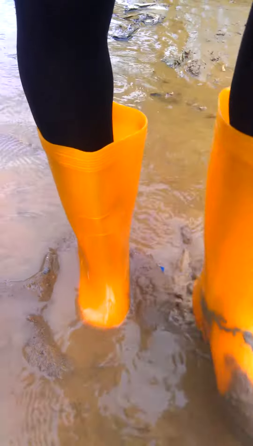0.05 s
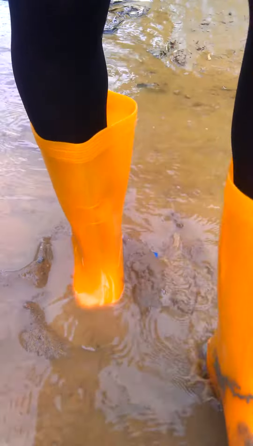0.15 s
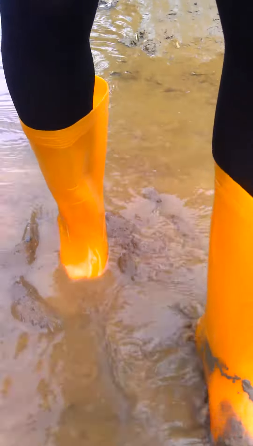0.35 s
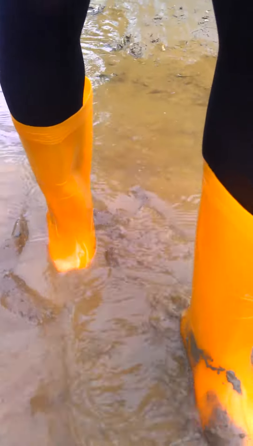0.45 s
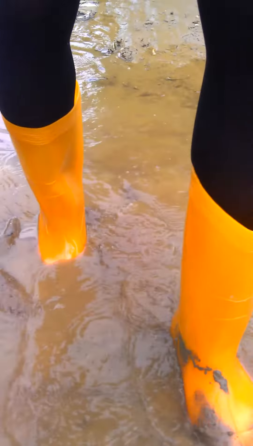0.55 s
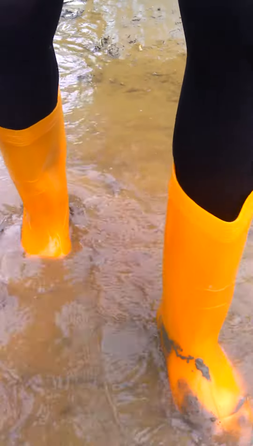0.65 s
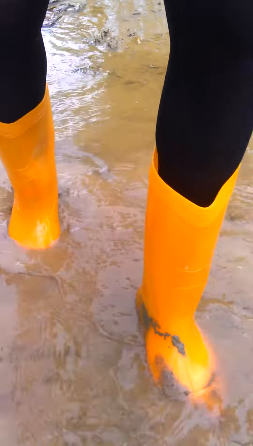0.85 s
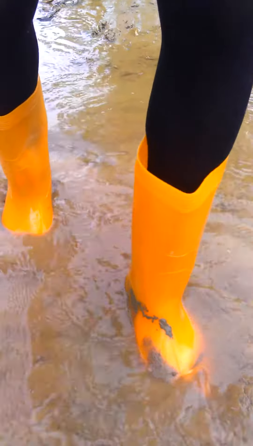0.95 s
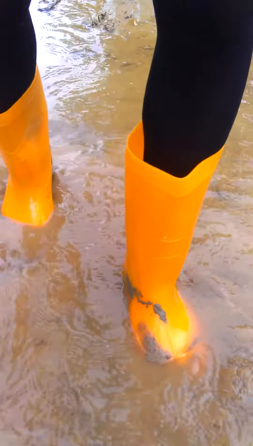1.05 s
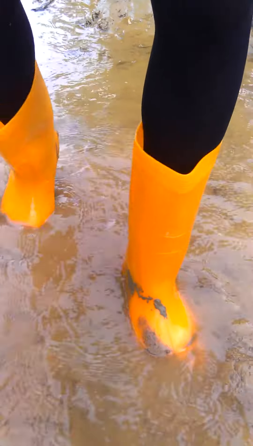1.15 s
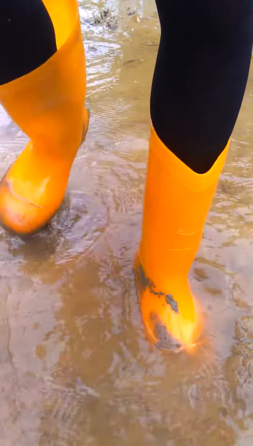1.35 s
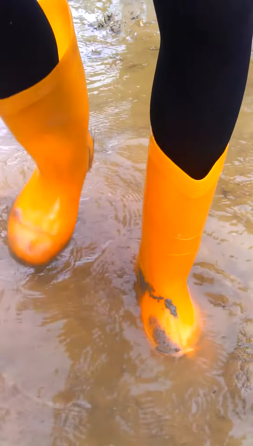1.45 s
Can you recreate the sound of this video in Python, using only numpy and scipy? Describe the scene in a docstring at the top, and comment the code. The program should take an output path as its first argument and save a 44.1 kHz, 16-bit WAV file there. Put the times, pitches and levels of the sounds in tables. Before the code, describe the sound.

A rubber boot presses into mud under shallow water close by, making one short, bright squelch followed by a soft plop and drips. A small bird then chirps twice far off, over a faint outdoor rush.

```python
"""Boot in flooded mud

A rubber boot presses into mud under shallow water. A few mud films and bubbles tick, trapped air
bursts out in one short, bright squelch, and the water closes with a plop and some drips.
A small bird chirps twice far off, over a faint outdoor rush."""
import sys
import numpy as np
from scipy import signal
from scipy.fft import rfft, irfft
from scipy.io import wavfile

SR = 44100
rng = np.random.default_rng(int(sys.argv[2]) if len(sys.argv) > 2 else 0)


def transcribe(signal):
    """Save signal, clipped to [-1, 1], as a 16-bit WAV file at the path in sys.argv[1]."""
    frames = np.atleast_2d(signal).T
    limited = np.clip(frames, -1, 1)
    pcm = np.round(limited * 32767).astype(np.int16)
    wavfile.write(sys.argv[1], SR, pcm)


N = 66150
T = np.arange(N) / SR

# Spectrum of spray and mud crackle: freq_hz, gain_db
WET_SPECTRUM = [(100, -20), (260, -7.5), (480, -1.5), (700, -16.5), (1200, -1.5), (2200, 3.5), (3300, 1),
                (4500, -1.5), (6300, 0.5), (7700, 2.5), (10000, 2), (12000, 1.5)]


def undb(db):
    """Decibels to gain."""
    return 10 ** (np.asarray(db) / 20)


def unit(x):
    """Scale to rms 1."""
    return x / np.sqrt(np.mean(x ** 2))


def colour(x, points):
    """Minimum-phase filter through (freq_hz, gain_db) points."""
    hz, db = np.array(points).T
    freq_hz = np.maximum(np.fft.rfftfreq(2 * N, 1 / SR), 1)
    gain = undb(np.interp(np.log(freq_hz), np.log(hz), db))
    cepstrum = irfft(np.log(gain))
    cepstrum[1:N] *= 2
    cepstrum[N + 1:] = 0
    return irfft(rfft(x, 2 * N) * np.exp(rfft(cepstrum)))[:N]


def wander(bandwidth_hz):
    """Smooth random signal, rms 1."""
    lowpass = np.exp(-(np.fft.rfftfreq(N, 1 / SR) / bandwidth_hz) ** 2)
    return unit(irfft(rfft(rng.standard_normal(N)) * lowpass, N))


def since(start_s):
    """Seconds since an event, zero before it."""
    return np.maximum(T - start_s, 0)


def echoes(x, t60_s):
    """Diffuse reflections: a decaying noise tail of unit energy."""
    tail = rng.standard_normal(N) * np.exp(-np.log(1000) * T / t60_s)
    return signal.fftconvolve(x, tail / np.linalg.norm(tail))[:N]


def outdoor_rush():
    """A distant rush wavers in four bands and slowly eases, with a smooth hiss on top."""
    # Rush spectrum: freq_hz, gain_db
    spectrum = [(24, -71), (40, -41), (97, -24), (162, -12.5), (289, -3), (450, -2), (542, -3.5),
                (609, -3.5), (668, -6.5), (786, -2), (992, -1.5), (1140, -2), (1250, -1.5), (1770, -6),
                (2400, -15), (3330, -12.5), (4010, -17), (8840, -13.5), (10400, -16.5), (13500, -64),
                (22000, -120)]
    level_db, fade_db_per_s, flicker_db = -50.5, 2, 1.5
    edges_hz = [180, 360, 720, 1400, 2400]
    freq_hz = np.fft.rfftfreq(N, 1 / SR)
    noise = colour(rng.standard_normal(N), spectrum)
    out = noise.copy()
    for low_hz, high_hz in zip(edges_hz, edges_hz[1:]):
        band = irfft(rfft(noise) * (freq_hz >= low_hz) * (freq_hz < high_hz), N)
        out += band * (undb(flicker_db * wander(11)) - 1)
    return unit(out) * undb(level_db - fade_db_per_s * (T - T.mean()))


def film_snaps():
    """A bursting film of wet mud rings for a few cycles and throws a wisp of spray."""
    # Mud films: start_s, pitch_hz, level_db
    films = [(.0825, 8700, -39), (.1573, 8400, -34.5), (0.1708, 8300, -36), (0.1742, 5230, -35),
             (.1766, 7400, -33), (0.1856, 8400, -27.5), (0.1879, 7400, -26), (0.217, 6800, -39),
             (.2260, 7700, -31), (0.2428, 6170, -17), (0.2515, 6100, -20.5), (.2529, 8600, -31),
             (0.255, 8700, -22), (0.2565, 6550, -11.5), (0.2609, 9740, -3.5), (0.2682, 6140, -20),
             (.2687, 6750, -11.5), (.2690, 9930, -9), (0.268, 9300, -13), (0.2714, 8700, -12.5),
             (0.2743, 8800, -21), (0.347, 9600, -34.5), (0.377, 6400, -32), (.4090, 6940, -39),
             (.4155, 9900, -37.5), (1.4450, 9100, -40)]
    rise_s, spray_decay_s, spray_db = 0.00023, 0.00058, -12.5
    rings, spray_env = np.zeros(N), np.zeros(N)
    for start_s, pitch_hz, level_db in films:
        t = since(start_s)
        env = (t / rise_s * np.exp(1 - t / rise_s)) ** 2
        rings += undb(level_db) * env * np.sin(2 * np.pi * pitch_hz * t)
        spray_env += undb(level_db) * (t > 0) * np.exp(-t / spray_decay_s)
    spray = unit(colour(rng.standard_normal(N), WET_SPECTRUM))
    return rings + undb(spray_db) * spray_env * spray


def mud_crackle():
    """Tiny bursts follow the pressure as mud squeezes past the sole."""
    # Pressure swells: peak_s, attack_s, release_s, level_db
    squeezes = [(0.184, .012, 0.0081, -53.5), (0.255, 0.009, .011, -20), (.375, 0.066, 0.038, -49.5)]
    bursts_per_s, spread_db = 3500, 5
    onsets = rng.random(N) < bursts_per_s / SR
    polarity = np.sign(rng.standard_normal(N))
    bursts = onsets * polarity * undb(spread_db * rng.standard_normal(N))
    pressure = np.zeros(N)
    for peak_s, attack_s, release_s, level_db in squeezes:
        swell = np.exp(-(np.maximum(peak_s - T, 0) / attack_s) ** 2)
        pressure += undb(level_db) * swell * np.exp(-since(peak_s) / release_s)
    return pressure * unit(colour(bursts, WET_SPECTRUM))


def bubbles():
    """Each air pocket rings briefly and rises in pitch as it surfaces."""
    # Air pockets: start_s, pitch_hz, level_db, decay_ms
    pockets = [(.1748, 3000, -40.5, 3.9), (0.1876, 3300, -38.5, 3.6), (0.2268, 1970, -33.5, 1.5),
               (.2440, 1770, -23.5, 1.8), (0.2449, 2440, -20.5, 0.65), (.2464, 3170, -16, 0.42),
               (0.25, 2190, -20, 0.89), (0.2524, 2217, -19, 2.9), (0.2579, 3020, -33, 0.53),
               (0.2651, 1940, -30, 1.5), (.2683, 1200, -27, 2.5), (0.269, 2120, -20, 0.61),
               (.2713, 1670, -27, 0.37), (.3310, 1840, -41, 2.5), (.3458, 5790, -42.5, 2.3),
               (0.369, 2640, -39, 1.3), (0.3698, 1267, -30.5, 7.4), (0.4012, 1990, -36.5, 1.6),
               (.4055, 3300, -42.5, 1.2), (0.4162, 1860, -43, 1.7), (1.4442, 3140, -50.5, 1.5),
               (1.4730, 2050, -47.5, 3)]
    attack_s, rise_per_decay = 0.00031, 0.02
    out = np.zeros(N)
    for start_s, pitch_hz, level_db, decay_ms in pockets:
        t = since(start_s)
        decays = t * 1000 / decay_ms
        env = (1 - np.exp(-t / attack_s)) * np.exp(-decays)
        phase = 2 * np.pi * pitch_hz * t * (1 + rise_per_decay * decays / 2)
        out += undb(level_db) * env / env.max() * np.sin(phase)
    return out


def sole_thud(start_s=0.36, pitch_hz=270, level_db=-58, decay_s=0.009):
    """The hollow under the sole gives a soft, low knock."""
    t = since(start_s)
    return undb(level_db) * np.exp(-t / decay_s) * np.sin(2 * np.pi * pitch_hz * t)


def bird():
    """Each whistle glides up, breaks into a fast trill and echoes in the open."""
    # Calls: start_s, length_s, low_hz, top_hz, level_db, trill_rad
    chirps = [(.770, 0.063, 3023, 3156, -49, 0.6), (0.955, 0.036, 2755, 3287, -44.5, 0.87)]
    glide_s, attack_s, fade_s, release_s = 0.00784, 0.0048, 0.068, 0.012
    out = np.zeros(N)
    for start_s, length_s, low_hz, top_hz, level_db, trill_rad in chirps:
        t = since(start_s)
        glide = 1 - np.exp(-t / glide_s)
        pitch_hz = (low_hz + (top_hz - low_hz) * glide) * (1 + 0.0081 * wander(125))
        trill_hz = 385 * (1 + 0.079 * wander(84))
        trill = trill_rad * glide ** 2 * np.sin(2 * np.pi * np.cumsum(trill_hz) / SR)
        env = np.minimum(t / attack_s, 1) * np.exp(-t / fade_s - since(start_s + length_s) / release_s)
        out += undb(level_db) * env * np.sin(2 * np.pi * np.cumsum(pitch_hz) / SR + trill)
    return out + undb(-1) * echoes(out, t60_s=0.3)


def scene():
    """The step, scattered by boots, water and banks, with the bird and the rush. Mono."""
    # Reflection response: freq_hz, gain_db
    scatter = [(100, -8), (1200, 2), (2500, 1), (6000, 6), (11000, -3)]
    step = bubbles() + film_snaps() + mud_crackle() + sole_thud()
    scattered = colour(step, scatter)
    near = undb(-8) * echoes(scattered, t60_s=0.045)
    far = undb(-25) * echoes(scattered, t60_s=0.45)
    return (step + near + far + bird() + outdoor_rush())[None]


def record(dry):
    """Steep low-pass on the top treble."""
    cutoff_hz = 10600
    lowpass = signal.firwin(601, cutoff_hz, fs=SR, window="blackman")
    return signal.fftconvolve(dry, lowpass[None], mode="same")


dry = scene()
out = record(dry)
transcribe(out)
```